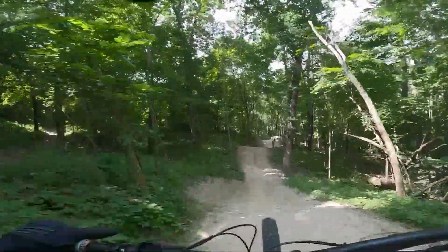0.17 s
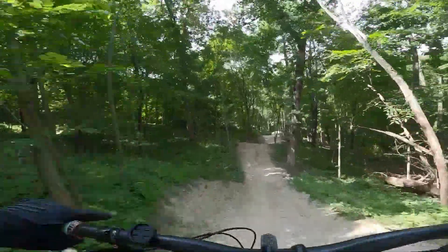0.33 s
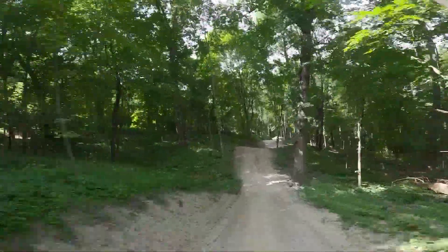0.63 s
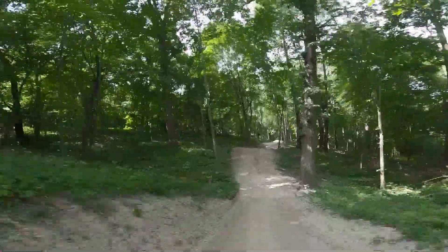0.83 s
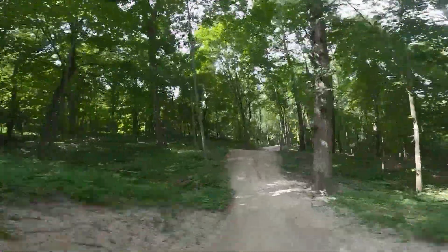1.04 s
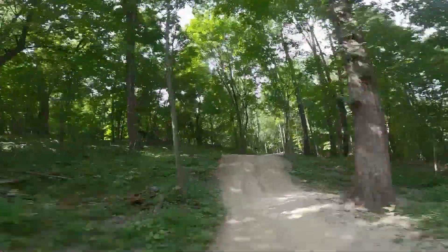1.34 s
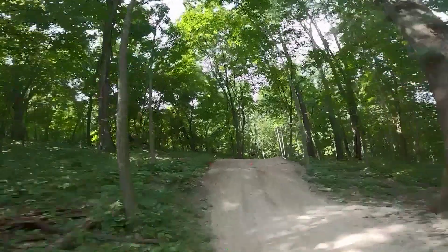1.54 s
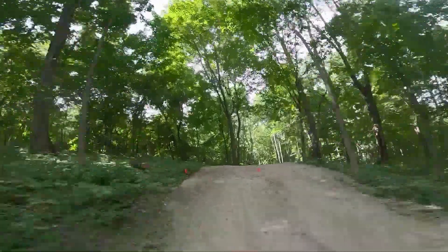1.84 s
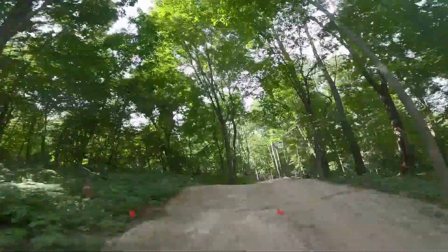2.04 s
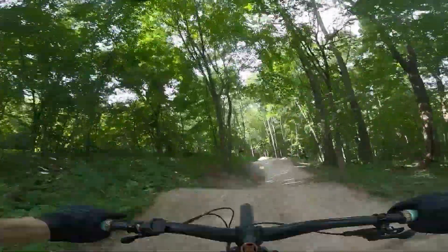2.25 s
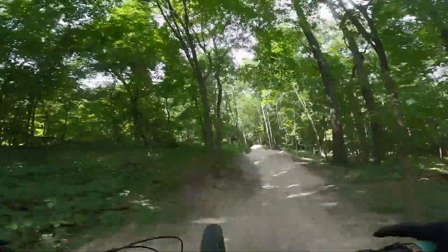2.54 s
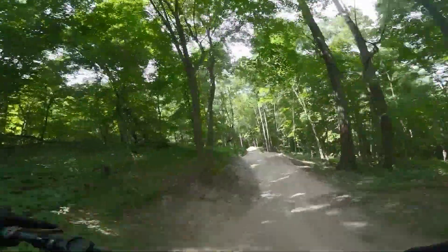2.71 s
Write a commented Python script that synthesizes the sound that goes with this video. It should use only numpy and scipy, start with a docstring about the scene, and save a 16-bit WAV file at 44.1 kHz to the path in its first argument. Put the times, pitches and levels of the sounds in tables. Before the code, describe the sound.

Wind rumbles and flutters on the rider's microphone throughout a mountain bike run. The tyres hum briefly, then leave the dirt. At about 0.8 seconds the bike lands with a clack and dull knocks, then rolls on, crunching grit while cables and chain tick. Tyre hum swells from 1.7 seconds, ending in a hard gust at 2.3. The wind then eases, with faint tyre noise near 2.8.

```python
"""Mountain bike on a dusty jump trail

Heard from the rider, with wind buffeting the microphone. The bike leaves one mound, lands with a
clatter, rolls on, hums up the next ramp and takes off through a hard gust. Tyres crunch on the dirt,
their knobs hum under load, grit rings the metal parts, and cables and chain tick over the bumps."""
import sys
import numpy as np
from scipy import signal
from scipy.fft import rfft, irfft
from scipy.io import wavfile
from scipy.ndimage import uniform_filter1d

SR = 44100
rng = np.random.default_rng(int(sys.argv[2]) if len(sys.argv) > 2 else 0)


def wav_record(signal):
    """Record a signal, one row per channel, as 16-bit PCM in the file named by sys.argv[1]."""
    frames = np.transpose(np.atleast_2d(signal))
    bounded = np.clip(frames, -1, 1)
    # unit amplitude maps onto the largest positive 16-bit level
    quanta = np.round(bounded * 32767).astype(np.int16)
    wavfile.write(sys.argv[1], SR, quanta)


N = 127008

# Base level of dust hiss, stone crunch and metal ring: time_s, level_db
CRUNCH_LEVEL = [(0, -56.5), (.16, -53), (.44, -54.5), (.57, -52), (.72, -55), (.79, -42.5), (.83, -57),
                (.94, -52.5), (1.3, -53), (1.5, -52.5), (1.7, -54), (1.78, -50.5), (2.295, -52),
                (2.325, -66), (2.42, -61.5), (2.55, -57), (2.71, -59), (2.88, -56)]
STONES_PER_S, STONE_SPREAD_DB = 370, -1.7


def undb(db):
    """Decibels to gain."""
    return 10 ** (np.asarray(db) / 20)


def unit(x):
    """Scale to rms 1."""
    return x / np.sqrt(np.mean(x ** 2))


def curve(table, column=1):
    """One table column, linear in time between rows."""
    rows = np.array(table, float)
    return np.interp(np.arange(N) / SR, rows[:, 0], rows[:, column])


def colour(x, spectrum):
    """Filter x by (freq_hz, gain_db) points, at rms 1."""
    hz, db = np.array(spectrum, float).T
    bins_hz = np.maximum(np.fft.rfftfreq(N, 1 / SR), 1)
    gain = undb(np.interp(np.log(bins_hz), np.log(hz), db))
    return unit(irfft(rfft(x) * gain, N))


def lowpass(x, cutoff_hz):
    """Second-order low-pass."""
    return signal.sosfilt(signal.butter(2, cutoff_hz, fs=SR, output="sos"), x)


def band_noise(low_hz, high_hz, order=2):
    """Noise between two edges, at rms 1."""
    sos = signal.butter(order, [low_hz, high_hz], "band", fs=SR, output="sos")
    return unit(signal.sosfilt(sos, rng.standard_normal(N)))


def wander(rate_hz):
    """Smooth random motion, at rms 1."""
    bins_hz = np.fft.rfftfreq(N, 1 / SR)
    return unit(irfft(rfft(rng.standard_normal(N)) * np.exp(-(bins_hz / rate_hz) ** 2), N))


def grains(per_s, spread_db):
    """Random impulses of either sign; a few stray far from size 1, upward if spread_db > 0."""
    size = undb(spread_db * np.minimum(rng.exponential(size=N), 6))
    return (rng.random(N) < per_s / SR) * size * np.sign(rng.standard_normal(N))


def since(start_s):
    """Seconds since start_s, zero before it."""
    return np.maximum(np.arange(N) / SR - start_s, 0)


def strike(start_s, decay_s, attack_s):
    """Linear attack, exponential decay."""
    age_s = since(start_s)
    return np.minimum(age_s / attack_s, 1) * np.exp(-age_s / decay_s)


def wind_rumble():
    """Slow pressure swings on the microphone, partly evened out in level."""
    # Wind pressure: time_s, level_db
    level = [(0, -20.5), (.4, -19), (.6, -25.5), (.76, -20.5), (1.0, -24), (1.6, -20), (1.85, -20),
             (2.35, -19), (2.55, -22), (2.72, -32.5), (2.88, -31.5)]
    # Pressure spectrum: freq_hz, gain_db
    spectrum = [(10, -33.5), (22, 1), (35, 0), (80, -1), (120, -5), (200, -19), (500, -45.5), (2000, -90.5)]
    swing = colour(rng.standard_normal(N), spectrum)
    envelope = uniform_filter1d(np.abs(signal.hilbert(swing)), size=1800)
    return unit(swing / envelope ** 0.18) * undb(curve(level))


def wind_eddies():
    """Eddies flutter at the microphone, with sudden puffs."""
    # Eddy strength: time_s, level_db
    level = [(0, -18), (.11, -21.5), (.25, -25), (.36, -24.5), (.46, -29.5), (.65, -34.5), (.73, -25),
             (.78, -15.5), (.89, -22), (.95, -23.5), (1.15, -22), (1.38, -24.5), (1.54, -20), (1.87, -28.5),
             (2.17, -24.5), (2.31, -20), (2.37, -31.5), (2.52, -27.5), (2.8, -36.5), (2.88, -35)]
    # Eddy spectrum: freq_hz, gain_db
    spectrum = [(50, -7), (120, -0.5), (250, 1), (370, -6), (520, -8.5), (740, -20), (1100, -27),
                (2000, -30.5), (4000, -50), (9000, -79.5)]
    flutter = unit(rng.standard_normal(N) * undb(2.5 * wander(rate_hz=44.8)))
    puffs = undb(-7.5) * unit(grains(per_s=140, spread_db=2))
    return colour(flutter + puffs, spectrum) * undb(curve(level))


def air_rush():
    """Air streams smoothly past the rider."""
    # Rush strength: time_s, level_db
    level = [(0, -31), (.55, -38.5), (2.3, -37.5), (2.36, -44), (2.45, -37.5), (2.7, -45.5), (2.88, -47)]
    # Rush spectrum: freq_hz, gain_db
    spectrum = [(200, -1), (700, -4), (1100, -7.5), (2000, -19), (5000, -27), (12000, -55.5)]
    return colour(rng.standard_normal(N), spectrum) * undb(curve(level))


def takeoff_gust():
    """A gust swells at the lip; two slaps of air break out of it, each a rasp on a short thud."""
    # Air slaps: peak_s, rasp_db, top_hz, thud_db, thud_hz
    slaps = [(2.3172, -15.5, 2070, -7, 338), (2.3364, -13, 1240, -7, 260)]
    # Gust spectrum: freq_hz, gain_db
    spectrum = [(55.5, -12), (111, 0), (930, -8), (1860, -38), (5580, -85)]
    centre_s, sigma_s = 2.308, 0.015
    rise_s, fall_s, thud_sigma_s = 0.0042, 0.0026, 0.0016
    time_s = since(0)
    swell = np.exp(-.5 * ((time_s - centre_s) / sigma_s) ** 2)
    out = undb(-17.5) * swell * colour(rng.standard_normal(N), spectrum)
    for peak_s, rasp_db, top_hz, thud_db, thud_hz in slaps:
        age_s = time_s - peak_s
        burst = np.exp(-np.abs(age_s) / np.where(age_s < 0, rise_s, fall_s))
        rasp = lowpass(burst * band_noise(473, top_hz, order=3), 1.26 * top_hz)
        thud = np.exp(-.5 * (age_s / thud_sigma_s) ** 2) * np.cos(2 * np.pi * thud_hz * age_s)
        out += undb(rasp_db) * rasp - undb(thud_db) * thud
    return out


def metal_ring():
    """Spokes and brake discs ring faintly under a rain of grit."""
    # Metal modes: freq_hz, gain_db
    modes = [(1357, 7.5), (2351, 7), (3063, -2), (4632, -10), (4764, -13), (6448, -13.5), (6757, -16),
             (7956, -20)]
    t60_s, relative_db = 0.14, -3.5
    age_s = since(0)
    ring = sum(undb(db) * np.sin(2 * np.pi * hz * age_s) for hz, db in modes)
    ring *= np.exp(-np.log(1000) * age_s / t60_s)
    shaken = signal.fftconvolve(grains(STONES_PER_S, STONE_SPREAD_DB), ring)[:N]
    return unit(shaken) * undb(relative_db + curve(CRUNCH_LEVEL))


def cable_ticks():
    """Cables and chain tap the frame: a bright crack with a narrow ring."""
    # Taps: start_s, level_db, decay_s, ring_hz, ring_gain_db
    taps = [(0.088, -44.5, 0.015, 3820, 9), (0.771, -29, 0.0099, 4570, -4), (0.802, -33, 0.0046, 4750, -1),
            (.8455, -36.5, .004, 4300, -2), (.87, -39, 0.0036, 5900, -6), (0.943, -31.5, 0.0061, 7800, -17),
            (1.007, -44, 0.0045, 7600, -7), (1.094, -37, 0.0043, 4500, -1), (1.541, -42, 0.0031, 3000, 13),
            (1.76, -32, 0.007, 3900, 3.5), (1.89, -40, .004, 5730, 1), (2.089, -41, 0.0043, 3980, 5.5),
            (2.239, -42, .012, 6100, -7)]
    # Crack spectrum: freq_hz, gain_db
    spectrum = [(500, -13), (2300, 12), (5000, -8.5), (6800, -7.5), (8500, -7), (10000, -20.5),
                (12500, -22), (13500, -40)]
    half_band_hz = 375
    crack = undb(1.5) * colour(rng.standard_normal(N), spectrum)
    out = np.zeros(N)
    for start_s, level_db, decay_s, ring_hz, ring_gain_db in taps:
        ring = undb(ring_gain_db) * band_noise(ring_hz - half_band_hz, ring_hz + half_band_hz)
        out += undb(level_db) * strike(start_s, decay_s, attack_s=0.003) * (crack + ring)
    return out


def suspension_knocks():
    """Dull blows pass through wheels and suspension; the front end booms as the fork compresses."""
    # Blows: start_s, level_db, decay_s, top_hz
    blows = [(0.087, -20.5, 0.025, 690), (0.759, -21.5, 0.024, 600), (0.808, -13, 0.0048, 700),
             (0.837, -14.5, 0.016, 480), (0.871, -18.5, 0.007, 875), (1.015, -15, 0.0087, 336),
             (1.119, -17, 0.0071, 593), (1.174, -20, 0.0085, 497), (1.501, -19, 0.0033, 720),
             (1.548, -20, 0.02, 445), (1.702, -17, 0.015, 740)]
    # Front-end booms: start_s, level_db, pitch_hz, decay_s
    booms = [(.762, -20, 186.7, 0.083), (.805, -8, 250, 0.0097), (.88, -9, 171, 0.024),
             (1.702, -19, 222.3, 0.042)]
    out = np.zeros(N)
    for start_s, level_db, decay_s, top_hz in blows:
        thump = band_noise(134, top_hz, order=3)
        out += undb(level_db) * strike(start_s, decay_s, attack_s=0.00057) * thump
    for start_s, level_db, pitch_hz, decay_s in booms:
        tone = np.sin(2 * np.pi * pitch_hz * since(start_s))
        out += undb(level_db) * strike(start_s, decay_s, attack_s=0.0022) * tone
    return out


def frame_clacks():
    """The frame clacks and rings briefly as the wheels touch down."""
    # Touchdowns: start_s, level_db
    touchdowns = [(.72, -12.5), (.758, -9)]
    # Frame modes: freq_hz, gain_db, t60_s
    modes = [(1070, -8, 0.06), (1390, -11, 0.033), (1470, -1.5, 0.059), (1956, -14, 0.074),
             (2420, -8, 0.018)]
    out = np.zeros(N)
    for start_s, level_db in touchdowns:
        crack = strike(start_s, decay_s=0.003, attack_s=0.00043) * band_noise(750, 2030)
        out += undb(level_db - 12) * crack
        for freq_hz, gain_db, t60_s in modes:
            detune, phase_turns = rng.standard_normal(2)
            ring = np.sin(2 * np.pi * (freq_hz * (1 + 0.011 * detune) * since(start_s) + phase_turns))
            envelope = strike(start_s, t60_s / np.log(1000), attack_s=0.00054)
            out += undb(level_db + gain_db) / 2 * ring * envelope
    return lowpass(out, cutoff_hz=4000)


def knob_hum(rate_ratio):
    """One tyre's knobs strike packed dirt at an unsteady rate; uneven blows add a buzz."""
    # Hum under load: time_s, base_rate_hz, level_db
    hum = [(0, 477, -24), (.2, 428.4, -56.5), (.7, 417.3, -41), (.85, 440, -37.5), (1.35, 470, -42.5),
           (1.68, 408.9, -30), (1.83, 463.4, -26.5), (1.92, 487.7, -27.5), (1.98, 474.6, -24),
           (2.045, 451.9, -25.5), (2.085, 544.2, -27), (2.145, 497, -21), (2.23, 449.5, -26.5),
           (2.36, 451.7, -58), (2.88, 449.7, -45.5)]
    knob_hz = rate_ratio * curve(hum) * (1 + 0.0451 * wander(rate_hz=70.7))
    phase = 2 * np.pi * np.cumsum(knob_hz) / SR
    tone = np.sin(phase) + undb(-15) * np.sin(2 * phase)
    buzz = undb(-6) * wander(rate_hz=129) * np.cos(phase)
    roughness = undb(3 * wander(rate_hz=61.4))
    return unit(tone * roughness + buzz) * undb(curve(hum, column=2))


def tyre_skim():
    """Lightly loaded tyres skim the slopes with a grainy rush."""
    # Skim strength: time_s, level_db
    level = [(0, -43), (.11, -34), (.2, -75), (.45, -65), (.55, -39.5), (.64, -35.5), (.69, -29.5),
             (.745, -32), (.78, -40), (.85, -68), (1.55, -72), (1.595, -33), (1.66, -40), (1.72, -65),
             (2.48, -72), (2.55, -62), (2.62, -71), (2.73, -57), (2.8, -40.5), (2.88, -41)]
    # Skim spectrum: freq_hz, gain_db
    spectrum = [(250, -13.5), (480, -7.5), (800, -17.5), (1180, -7), (1340, 0.5), (1470, 2), (1700, -4.5),
                (2100, -7), (2550, -10), (3000, -12.5), (3600, -13.5), (4300, -18.5), (5200, -21),
                (7000, -25), (9500, -41), (13000, -65)]
    return colour(grains(per_s=9000, spread_db=1), spectrum) * undb(curve(level))


def tyre_crunch():
    """The tread crushes grit and stones, dust hisses above; uneven ground shakes grit and dust."""
    # Rush of loaded tyres on dirt: time_s, level_db
    roll_level = [(0, -28.5), (.11, -54), (.16, -50), (.48, -45), (.7, -36.5), (.77, -26), (.84, -41),
                  (.95, -32.5), (1.35, -33.5), (1.52, -37), (1.61, -42), (1.7, -38.5), (1.78, -30.5),
                  (1.97, -25.5), (2.14, -24.5), (2.28, -37), (2.35, -73), (2.55, -41.5), (2.61, -61),
                  (2.88, -52)]
    # Tyres rung by grit: freq_hz, gain_db
    grit_spectrum = [(200, -15.5), (480, 7), (600, 2.5), (760, -11), (1030, 1.5), (1200, -4), (1430, 3),
                     (1850, 0.5), (2170, -11), (2380, -11), (3200, -18), (4500, -29.5), (6500, -51.5),
                     (12000, -74.5)]
    # Dust hiss: freq_hz, gain_db
    dust_spectrum = [(1000, -29.5), (2600, 4), (3700, -1.5), (4800, -2.5), (5800, -7), (8300, -10),
                     (10000, -18.5), (12000, -28.5), (14000, -48.5)]
    # Crushed stones: freq_hz, gain_db
    stone_spectrum = [(600, -7.5), (1700, -16), (2130, -5), (2450, 2.5), (3000, -4), (4500, -9.5),
                      (8000, -35), (12000, -53)]
    stone_decay_s, full_contact_db = 0.0036, -41.5
    ground = wander(rate_hz=66.5)
    grit = colour(grains(per_s=8000, spread_db=0.9) * undb(2.5 * ground), grit_spectrum)
    dust = colour(grains(per_s=9000, spread_db=1) * undb(ground), dust_spectrum)
    impacts = np.abs(grains(STONES_PER_S, STONE_SPREAD_DB))
    bursts = signal.lfilter([1], [1, -np.exp(-1 / (stone_decay_s * SR))], impacts)
    stones = undb(7.5) * colour(bursts * rng.standard_normal(N), stone_spectrum)
    roll_db = curve(roll_level)
    contact = np.minimum(undb(roll_db - full_contact_db), 1)
    return grit * undb(roll_db) + (contact * stones + dust) * undb(curve(CRUNCH_LEVEL))


def scene():
    """Wind, tyres and rattles at one microphone."""
    front_hum = knob_hum(rate_ratio=0.99)
    rear_hum = undb(-8) * knob_hum(rate_ratio=1.14)
    wind = wind_rumble() + wind_eddies() + air_rush() + takeoff_gust()
    tyres = front_hum + rear_hum + tyre_skim() + tyre_crunch()
    rattles = metal_ring() + suspension_knocks() + frame_clacks() + cable_ticks()
    return (wind + tyres + rattles)[None]


def record(dry):
    """The camera rounds the highest peaks and cuts the top; both ends fade without a click."""
    ceiling, fade_s, top_hz = 0.8, 0.004, 13800
    to_edge_s = np.minimum(since(0), since(0)[::-1])
    fade = np.sin(np.pi / 2 * np.minimum(to_edge_s / fade_s, 1)) ** 2
    rounded = ceiling * np.tanh(dry / ceiling)
    return signal.sosfilt(signal.ellip(8, .2, 70, top_hz, fs=SR, output="sos"), fade * rounded)


dry = scene()
out = record(dry)
wav_record(out)
```